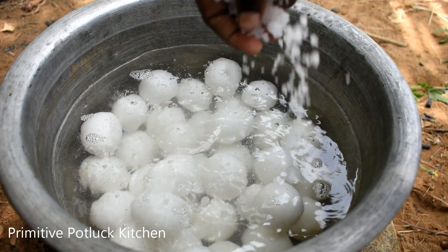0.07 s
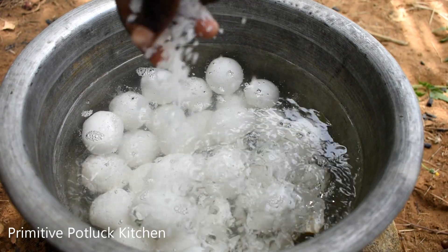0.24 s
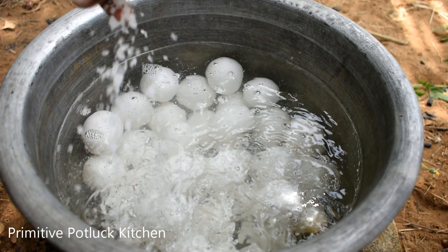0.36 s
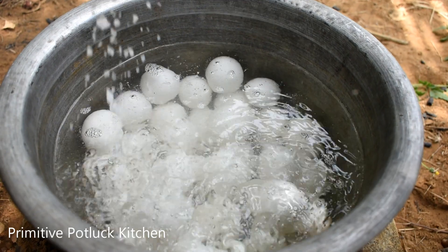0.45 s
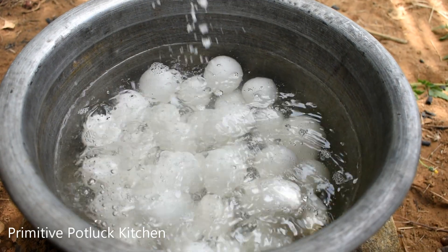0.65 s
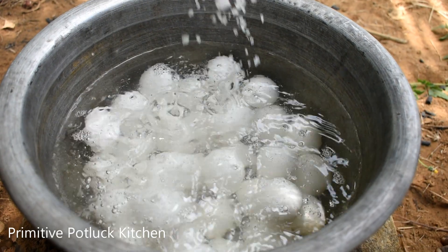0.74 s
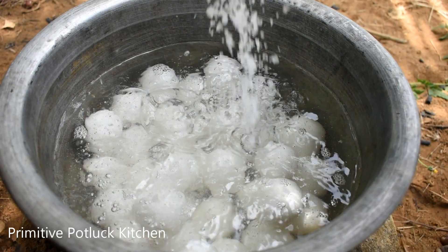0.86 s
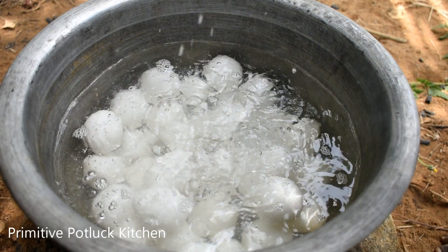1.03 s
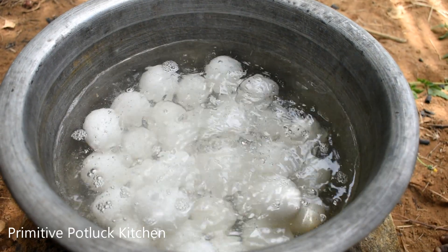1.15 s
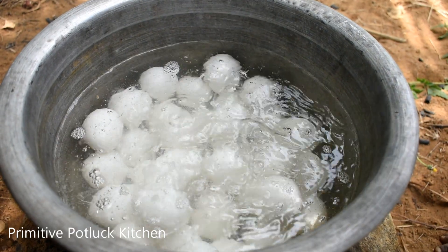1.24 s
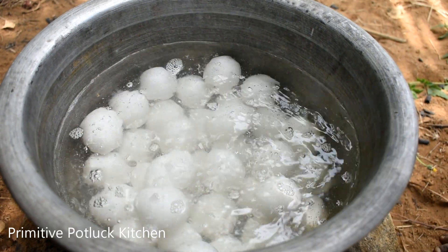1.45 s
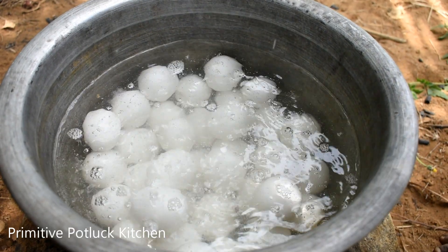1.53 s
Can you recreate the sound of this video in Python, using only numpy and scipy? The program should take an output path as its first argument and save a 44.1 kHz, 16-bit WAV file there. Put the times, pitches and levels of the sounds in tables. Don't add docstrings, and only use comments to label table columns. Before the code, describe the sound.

Coarse salt patters into a pot of water and eggs, sharp ticks and tiny bubbly plinks thickening for about a second, then thinning to stray clicks; close microphone outdoors, soft air hiss, brief bird trill first.

```python
import sys
import numpy as np
from scipy import signal
from scipy.fft import rfft, irfft
from scipy.io import wavfile
from scipy.ndimage import uniform_filter1d

SR = 44100
rng = np.random.default_rng(int(sys.argv[2]) if len(sys.argv) > 2 else 0)


def gain_from_decibels(decibels):
    exponent = np.asarray(decibels, float) / 20
    return 10 ** exponent


def dump(signal):
    limited = np.clip(np.atleast_2d(signal).T, -1, 1)
    pcm = np.round(limited * 32767).astype(np.int16)
    wavfile.write(sys.argv[1], SR, pcm)


N = 70560


def evened(x):
    return x / np.sqrt(np.mean(x ** 2) + 1e-20)


def smoothed(x, size):
    return uniform_filter1d(uniform_filter1d(x, size=size), size=size)


def coloured(x, points):
    f, level = np.transpose(points)
    hz = np.fft.rfftfreq(len(x), 1 / SR)
    gain = gain_from_decibels(np.interp(np.log(hz + 1), np.log(f + 1), level))
    return irfft(rfft(x) * gain, len(x))


def along(curve):
    s, level = np.transpose(curve)
    return gain_from_decibels(np.interp(np.arange(N) / SR, s, level, left=-99, right=-99))


def add(mix, s, sound):
    part = mix[round(s * SR):][:len(sound)]
    part += sound[:len(part)]


def ring(hz, cycles, rise=0, swell=0.0092):
    turns = np.arange(1200) / SR * hz
    swelling = 1 - np.exp(-turns / swell)
    dying = gain_from_decibels(-60 * turns / cycles)
    bend = 1 + rise * np.minimum(turns / cycles, 1)
    return -swelling * dying * np.sin(2 * np.pi * turns * bend)


def grains(per_s, spread_db, lo_hz, hi_hz, cycles, count=24):
    strength = gain_from_decibels(spread_db * np.minimum(rng.exponential(1, N), 4))
    hits = strength * (rng.random(N) < per_s / SR)
    kind = rng.integers(0, count, N)
    stretch = rng.uniform(.5, 1.5, count)
    out = np.zeros(N)
    for k, hz in enumerate(np.geomspace(lo_hz, hi_hz, count)):
        tone = np.sqrt(hz / stretch[k]) * ring(hz, cycles * stretch[k])
        out += signal.oaconvolve(hits * (kind == k), tone)[:N]
    return evened(out)


def crystals():
    # (t/s, level/dB, f/Hz)
    snaps = [(.0864, -16, 4880), (.229, -3, 7000), (.2365, -12, 10000), (.2407, -7, 6000),
             (.2831, -5, 8000), (.2903, -8, 6000), (.2949, -9, 8300), (.334, -14, 10000), (.3452, -7, 6500),
             (.3549, -12, 10000), (.356, -9, 7000), (.3653, -2, 7500), (.3994, -9, 10000),
             (.4019, -13, 6000), (.4034, -9, 6000), (.41, -14, 8400), (.4431, -4, 9500), (.4697, -9, 8700),
             (.4731, -9, 10600), (.4897, -14, 8000), (.5024, -12, 8000), (.5132, -10, 8600),
             (.537, -12, 9700), (.5488, -13, 10000), (.5751, -7, 10000), (.5764, -15, 9500),
             (.5804, -20, 10800), (.5938, -12, 9500), (.6192, -2, 10000), (.644, -19, 8500),
             (.6514, -15, 6000), (.6769, -10, 6000), (.68, -14, 9600), (.6935, -12, 7900),
             (.6988, -16, 7000), (.7148, -11, 6900), (.7253, -11, 10500), (.7307, -9, 11000),
             (.737, -2, 8000), (.7422, -9, 7800), (.7726, -14, 9000), (.7893, -5, 6500), (.7957, -9, 6650),
             (.8383, -7, 6500), (.8736, -8, 7500), (.8991, -7, 11600), (.9279, -7, 6700), (.9548, -2, 5500),
             (.9701, -12, 9000), (.9785, -11, 12500), (.9917, -5, 7400), (1.0111, -11, 8100),
             (1.0305, -15, 7400), (1.0733, -11, 7000), (1.1027, -13, 6300), (1.1532, -20, 10000),
             (1.1998, -20, 7200), (1.233, -22, 11000), (1.2765, -19, 12500), (1.3929, -25, 8700)]
    # (t/s, level/dB, f/Hz)
    ticks = [(0.2137, -12, 9400), (0.2161, -12.5, 9300), (0.4212, -5, 9800), (0.4381, -11, 8100),
             (.448, 1, 9600), (.5058, -13, 8400), (.507, -17, 6500), (.524, -5, 8300), (.5633, -21, 7660),
             (.5726, -14, 12300), (.5867, -24, 8100), (.6321, -10, 13300), (0.4468, 2.5, 11100),
             (0.4497, -10, 7750), (0.4565, 0, 8300), (0.5228, -3.5, 8850), (0.5513, -12, 8800),
             (0.6614, -14, 8700), (.6635, -8.5, 8800), (0.7042, -16, 7400), (0.719, -12, 8010.0),
             (.774, -15, 12500), (.8305, -18, 10400), (0.9152, -10, 13400), (0.9152, -7, 7700),
             (0.9453, -4, 6900), (0.9577, -6, 12700), (0.9577, 0.5, 6800), (1.0402, -6.5, 13200),
             (1.0779, -8, 8700), (1.0881, -10, 13470), (1.1639, -17, 10700), (1.1628, -19, 13500),
             (1.175, -28, 9300), (1.176, -29, 12500), (1.2018, -23, 10800), (1.4228, -16.5, 11090.0),
             (1.4242, -26, 13500), (1.2764, -24, 12900), (1.4872, -19, 12100), (1.5005, -27, 12700),
             (1.5879, -29, 8400), (.8383, -14.5, 6930), (.2832, -19, 8900), (.9918, -8.5, 14000),
             (.7957, -9, 12900), (.7307, -12, 14500)]
    # (t/s, level/dB, f/Hz)
    chimes = [(0.0861, -24, 10740), (0.2161, -15, 7180), (0.2174, -17.5, 7190), (0.2502, -13.5, 9700),
              (0.4583, -18, 6200), (0.9649, -19, 7540), (0.9922, -17, 6250), (1.0654, -23, 7270),
              (1.1626, -29, 6480), (1.16, -29, 10750), (1.2323, -30, 7600), (1.2761, -27.5, 10060),
              (1.4625, -29.5, 9500), (1.4697, -33, 9400), (1.4872, -38, 9700)]
    spray_hz, spray_t60_s = 9000, .012
    band = signal.butter(2, [spray_hz / 2, spray_hz * 2.26], "bandpass", fs=SR, output="sos")
    out, t = np.zeros(N), np.arange(1200) / SR
    # hits, cycles to fall 60 dB, spray level/dB
    for hits, cycles, spray_db in ((snaps, 3, -19), (ticks, 18, -16), (chimes, 85, -16)):
        for s, db, hz in hits:
            noise = signal.sosfilt(band, rng.standard_normal(1200))
            spray = noise * gain_from_decibels(spray_db - 60 * t / spray_t60_s)
            add(out, s, gain_from_decibels(db) * (ring(hz, cycles) + spray))
    return out


def bubbles():
    # (t/s, level/dB, f/Hz, cycles to fall 60 dB)
    varied = [(0.181, -27, 4680, 45.0), (0.2142, -14.5, 4940, 61), (0.229, -18.5, 2064, 73),
              (0.2414, -20, 1510, 49), (0.283, -24.5, 1910, 52), (0.3724, -24, 1940, 56),
              (0.4211, -13, 3040, 19.5), (0.4428, -20, 2490, 49), (0.452, -16.5, 1965, 33),
              (0.4568, -18, 4390, 59), (0.4944, -15, 3080, 23), (0.514, -16.5, 1433, 29.5),
              (0.551, -21, 2070, 34), (0.6189, -21.5, 1603, 51), (0.6222, -26, 1555, 53),
              (0.6768, -24.5, 3220, 43), (0.7367, -21.5, 2570, 32), (0.7965, -18, 1930, 33),
              (0.839, -20.5, 1920, 39), (0.921, -24, 2060, 73), (0.925, -21, 2540, 43),
              (0.9476, 2.5, 3670, 23.5), (0.9465, -16.5, 2020, 38), (0.9541, -4, 4000, 15),
              (0.9733, -23, 1900, 33), (1.0046, -16.5, 2070, 20), (1.0387, -21, 1820, 52),
              (1.044, -24.5, 4250, 65), (1.0527, -23, 2010, 44), (1.0884, -17, 5000, 33)]
    # (t/s, level/dB, f/Hz)
    alike = [(0.2141, -16, 3700), (.255, -19, 2900), (0.266, -22, 2960), (0.329, -24.5, 2800),
             (0.341, -19, 4050), (0.355, -19.5, 2650), (.4465, -21, 2500), (0.4925, -20.5, 1970),
             (.49, -24, 2000), (0.547, -21.5, 2900), (0.4382, -20, 2740), (.449, -20, 2560),
             (0.5024, -20, 2800), (.5922, -30, 4170), (0.6365, -28, 2800), (.772, -35, 3000),
             (1.0128, -18, 4050), (1.0765, -21.5, 2650), (0.383, -21, 4100), (.312, -28, 2850),
             (0.3467, -19, 3700), (0.5318, -26, 3030), (1.0517, -21, 3450), (1.163, -27, 4470),
             (.296, -24, 3340), (0.329, -27, 4130), (0.651, -26, 3340), (.663, -29, 3230),
             (.699, -26, 3700), (.7365, -17, 3270), (.857, -26, 2630), (.9483, -2.5, 4060),
             (0.991, -27.5, 1030), (0.9912, -18.5, 1970), (1, -23, 2450), (1.024, -26, 1670),
             (1.0722, -25, 2470), (1.103, -27.5, 3540)]
    alike_cycles, wobble_db = 31.8, 1.6
    out = np.zeros(N)
    for s, db, hz, cycles in [*varied, *[(*row, alike_cycles) for row in alike]]:
        wobble = evened(smoothed(rng.standard_normal(1200), 30))
        add(out, s, gain_from_decibels(db + wobble_db * wobble) * ring(hz, cycles, rise=0.012, swell=0.66))
    return out


def flow():
    # (middle t/s, length/s, level/dB)
    clumps = [(0.252, 0.1, -36), (0.291, 0.036, -35), (0.364, 0.16, -42), (0.42, 0.038, -34.5),
              (0.46, 0.073, -31), (0.518, 0.11, -33), (0.635, 0.02, -37.5), (0.742, 0.064, -37),
              (0.807, 0.088, -36.5), (0.861, 0.017, -33), (0.834, .015, -48), (0.887, 0.069, -37.5),
              (1.157, .014, -40.5), (1.23, .012, -43.5), (0.327, .016, -37), (0.919, 0.034, -30.5),
              (0.959, 0.13, -34.5), (1.009, 0.081, -37), (1.051, 0.05, -26.5), (1.081, 0.033, -32.5)]
    pour_start_s, pour_end_s = 0.176, 1.15
    t = np.arange(N) / SR
    dribble = gain_from_decibels(-45.5 - 61 * (t - pour_end_s))
    steady = np.where(t < pour_end_s, gain_from_decibels(-43.5), dribble)
    steady = np.where(t < pour_start_s, gain_from_decibels(-47.5), steady)
    level = uniform_filter1d(steady, size=600)
    for middle, length, db in clumps:
        hump = np.cos(np.pi * np.clip((t - middle) / length, -.5, .5)) ** 2
        level = level + gain_from_decibels(db) * hump
    return level


def shower():
    # (f/Hz, level/dB)
    tick_colour = [(1180, -35), (2000, -18.5), (4610, -1), (6360, 1.5), (8550, 6), (13600, 2.5),
                   (16000, -2)]
    level = flow()
    crowd = np.sqrt(level / gain_from_decibels(-36))
    fine = evened(coloured(grains(5000 * crowd, 3, 2460, 13900, 14.5), tick_colour))
    plops = grains(1100 * crowd, 3, 1830, 5100, 16)
    return level / np.sqrt(crowd) * (gain_from_decibels(-1.5) * fine + gain_from_decibels(-9) * plops)


def rustle():
    # (t/s, level/dB)
    rubbing = [
        (1.44, -63),
        (1.48, -41),
        (1.56, -47),
        (1.6, -52),
    ]
    return along(rubbing) * gain_from_decibels(1.5) * grains(13000, 5.2, 8060, 18000, 24)


def rim():
    # (f/Hz, level/dB, time to fall 60 dB/s)
    modes = [
        (6130, -17.5, 0.095),
        (6934, -13, 0.049),
        (8005, -4, 0.0535),
        (8699, -8, 0.051),
        (11200, -2, 0.022),
    ]
    out, t = np.zeros(N), np.arange(4000) / SR
    for hz, db, t60 in modes:
        add(out, 1.4228, gain_from_decibels(-29.5 + db - 60 * t / t60) * np.sin(2 * np.pi * hz * t))
    return out


def bird():
    # (t/s, level/dB, f/Hz)
    trill = [
        (0.0343, -45.5, 5360),
        (0.0628, -46, 5300),
        (0.089, -37, 5280),
        (0.1191, -38.5, 5500),
        (0.1477, -35.5, 5540),
        (0.18, -34, 5500),
    ]
    note_s, fall_hz, blur_db = 0.011, 600, 2.5
    pickup_db, pickup_lead_s, pickup_rise_hz = -12, 0.015, 243
    out, u = np.zeros(N), np.linspace(0, 1, round(note_s * SR))
    for s, db, hz in trill:
        blur = evened(uniform_filter1d(rng.standard_normal(len(u)), size=60))
        shape = gain_from_decibels(db + blur_db * blur) * np.sin(np.pi * u ** 0.43)
        falling_hz = hz + fall_hz * (.5 - u)
        rising_hz = hz - 150 + pickup_rise_hz * (u - .5)
        add(out, s, shape * np.sin(2 * np.pi * np.cumsum(falling_hz) / SR))
        pickup = gain_from_decibels(pickup_db) * shape * np.sin(2 * np.pi * np.cumsum(rising_hz) / SR)
        add(out, s - pickup_lead_s, pickup)
    return out


def yard():
    # (f/Hz, level/dB)
    air_colour = [(20, -46), (80, -24.5), (250, -10.5), (700, -7), (2000, -10.5), (4000, -13), (9000, -14),
                  (16000, -13)]
    return gain_from_decibels(-43.5) * evened(coloured(rng.standard_normal(N), air_colour))


def scene():
    hard_filter = signal.butter(1, 1500, "highpass", fs=SR, output="sos")
    pot_filter = signal.butter(3, 750, "highpass", fs=SR, output="sos")
    hard = signal.sosfilt(hard_filter, crystals())
    pot = signal.sosfilt(pot_filter, hard + bubbles() + shower() + rustle() + rim())
    return (pot + bird() + yard())[None]


def band_limit(x):
    return signal.sosfilt(signal.butter(12, 17030, fs=SR, output="sos"), x)


def record(dry):
    thump = gain_from_decibels(-27) * smoothed(dry ** 4, 150)
    lowpass = signal.firwin(511, 15900, window=("kaiser", 9), fs=SR)
    x = signal.oaconvolve(dry + thump, lowpass[None], "same")
    return band_limit(np.clip(x, -1, 1))


dry = scene()
out = record(dry)
dump(out)
```